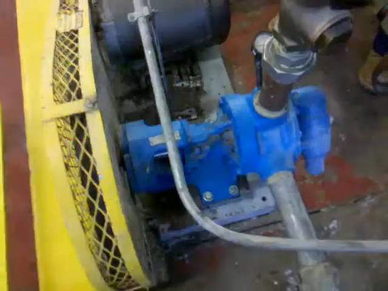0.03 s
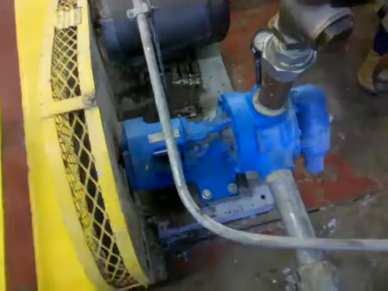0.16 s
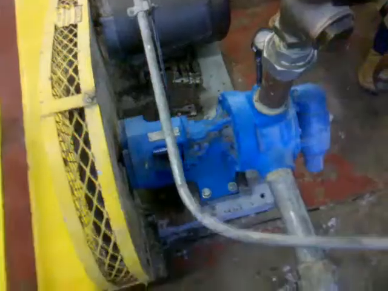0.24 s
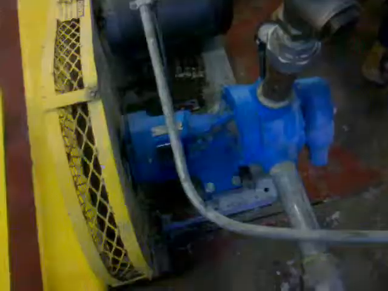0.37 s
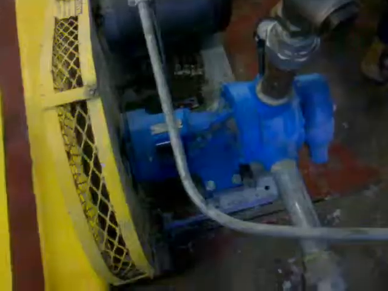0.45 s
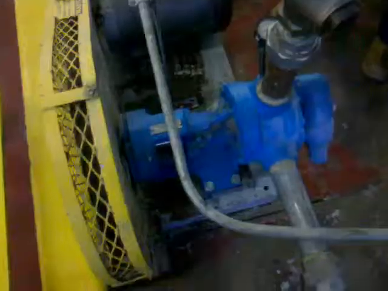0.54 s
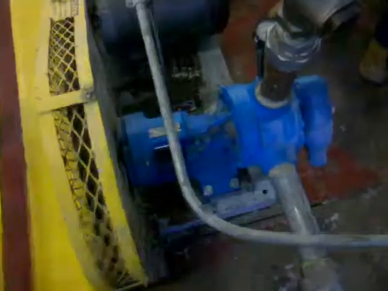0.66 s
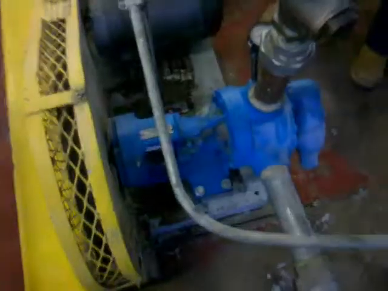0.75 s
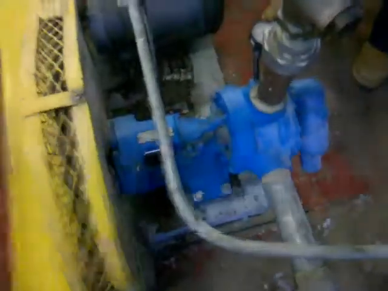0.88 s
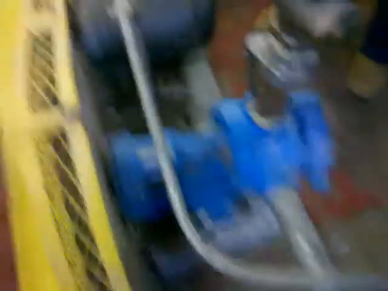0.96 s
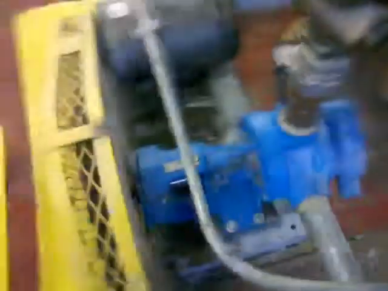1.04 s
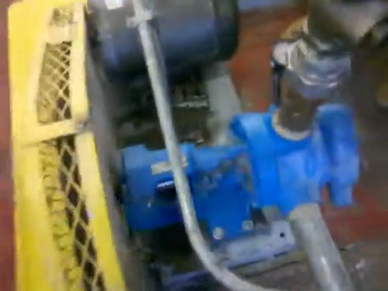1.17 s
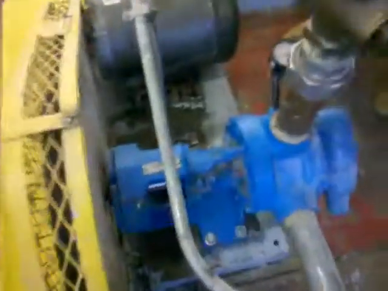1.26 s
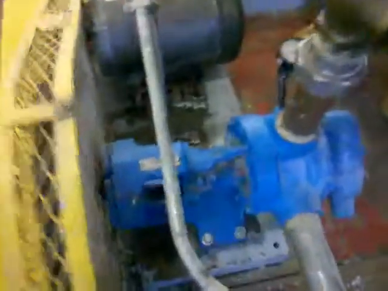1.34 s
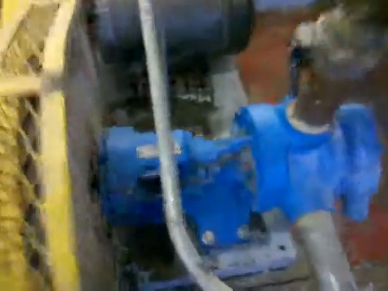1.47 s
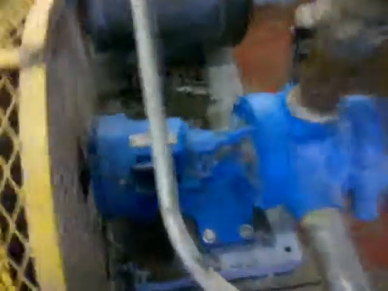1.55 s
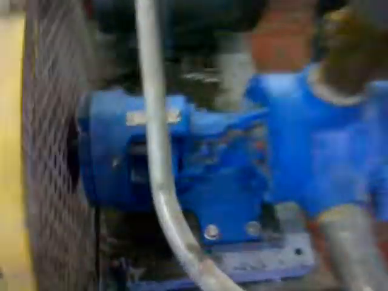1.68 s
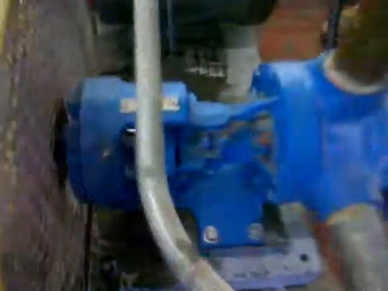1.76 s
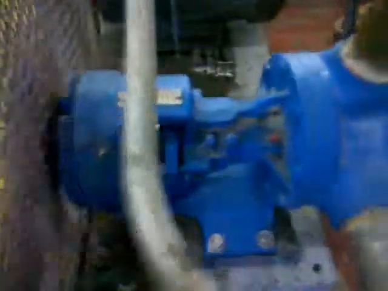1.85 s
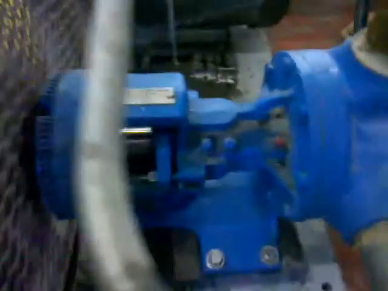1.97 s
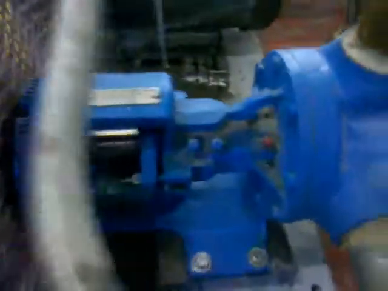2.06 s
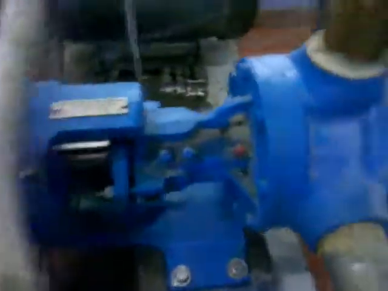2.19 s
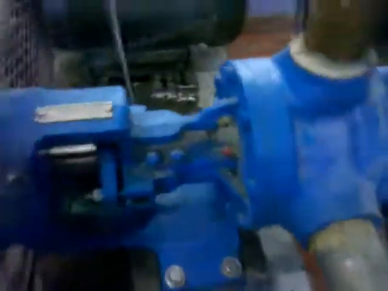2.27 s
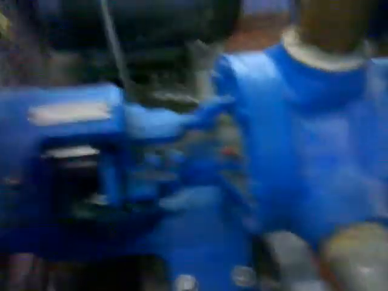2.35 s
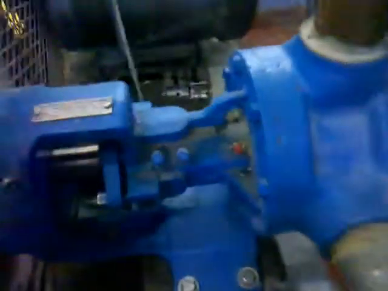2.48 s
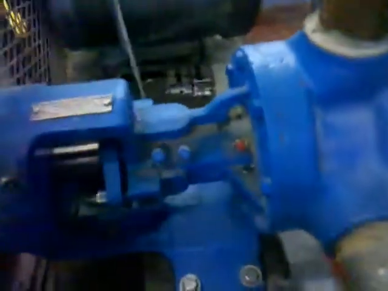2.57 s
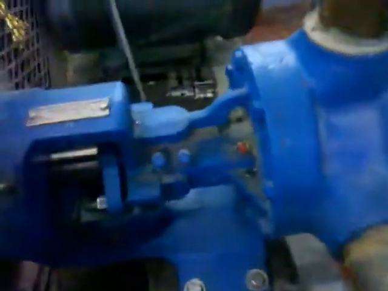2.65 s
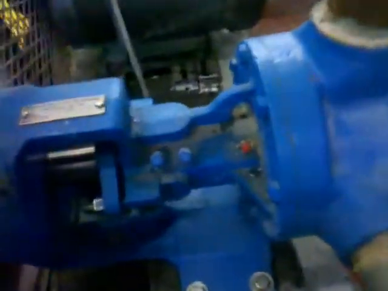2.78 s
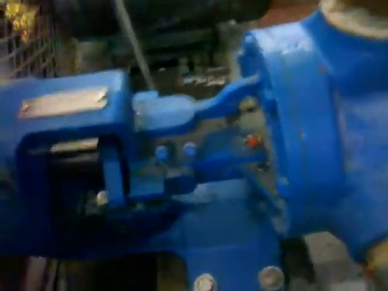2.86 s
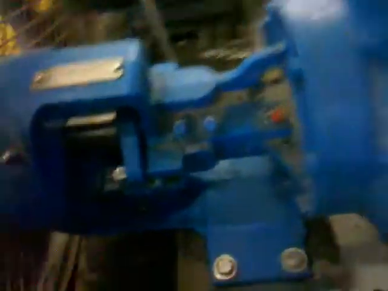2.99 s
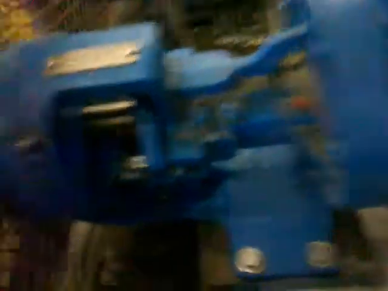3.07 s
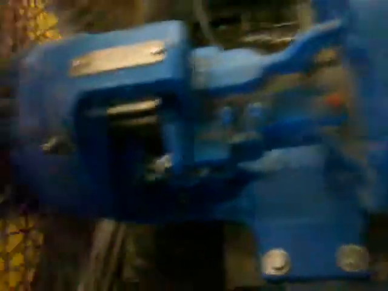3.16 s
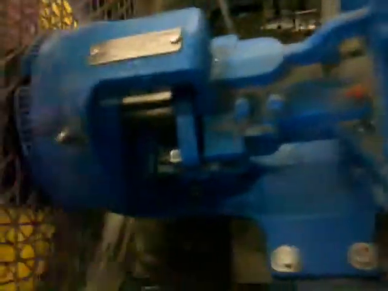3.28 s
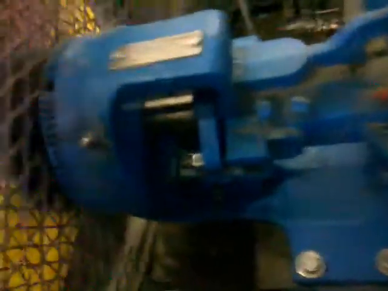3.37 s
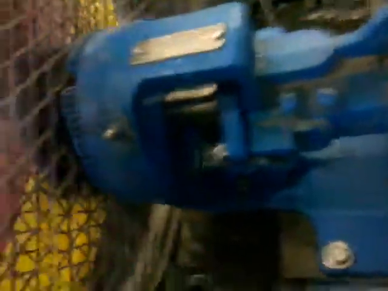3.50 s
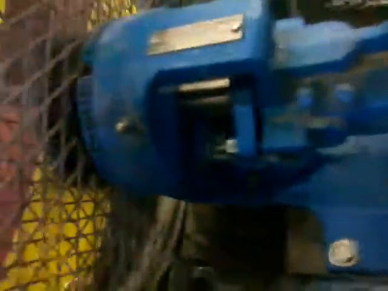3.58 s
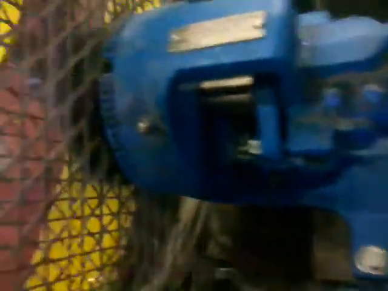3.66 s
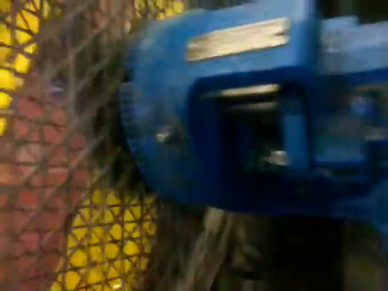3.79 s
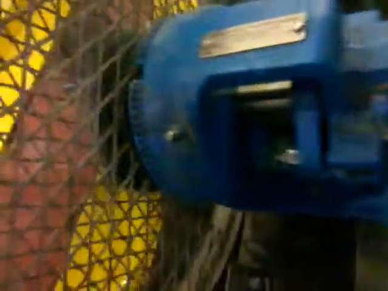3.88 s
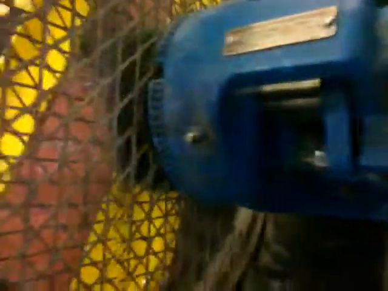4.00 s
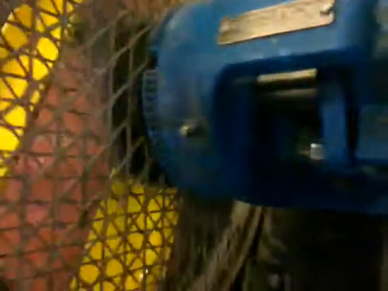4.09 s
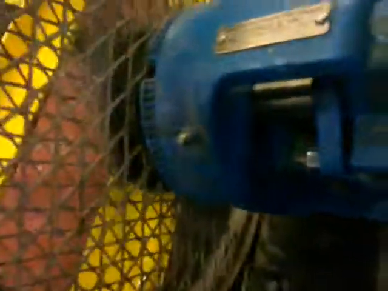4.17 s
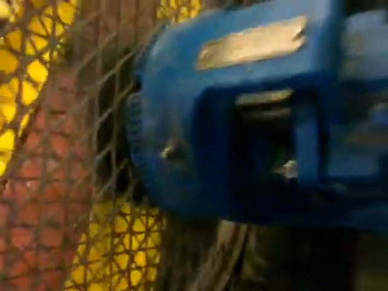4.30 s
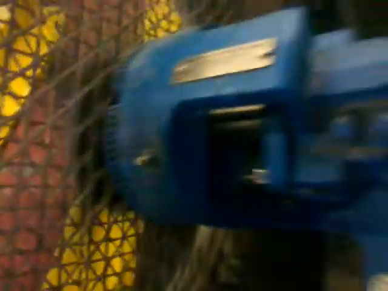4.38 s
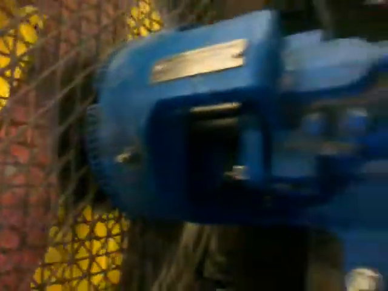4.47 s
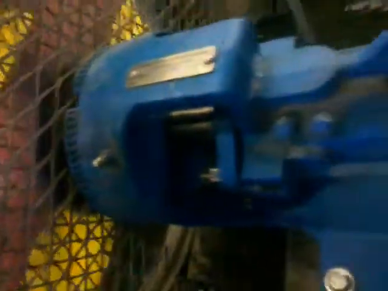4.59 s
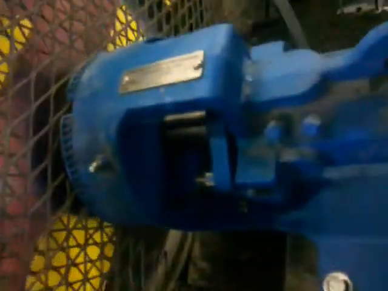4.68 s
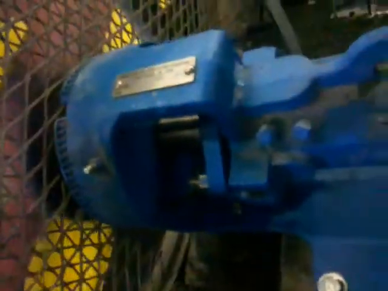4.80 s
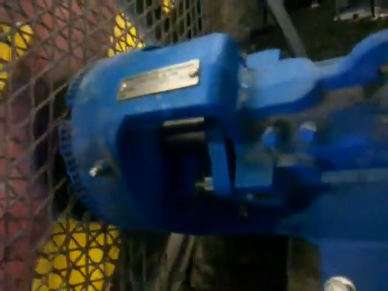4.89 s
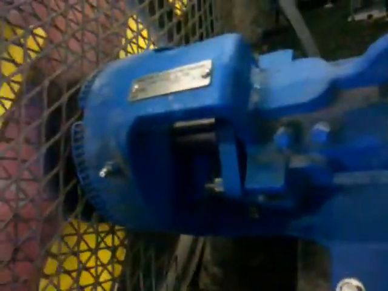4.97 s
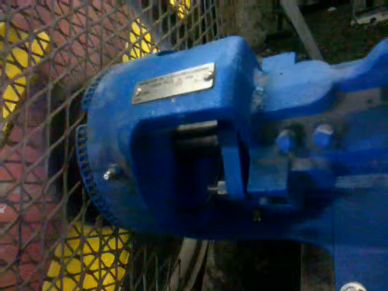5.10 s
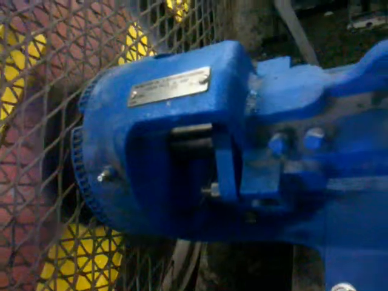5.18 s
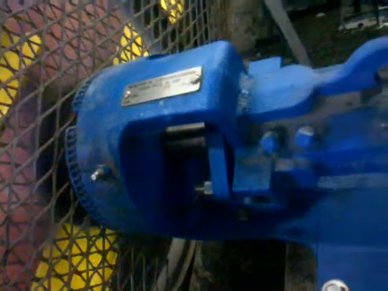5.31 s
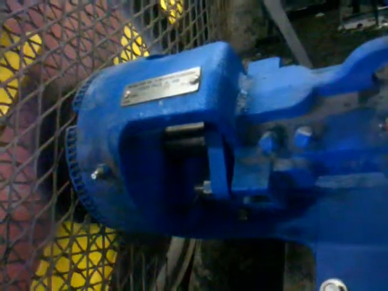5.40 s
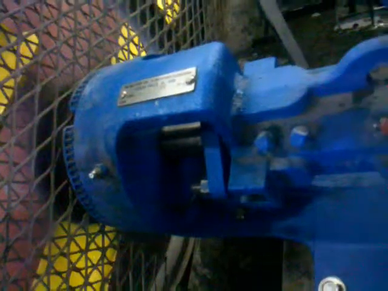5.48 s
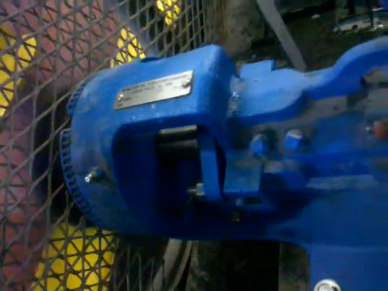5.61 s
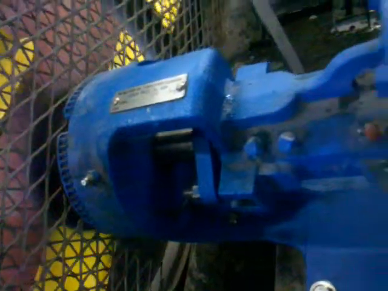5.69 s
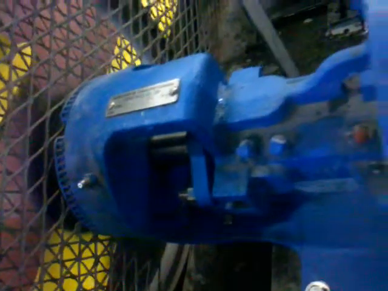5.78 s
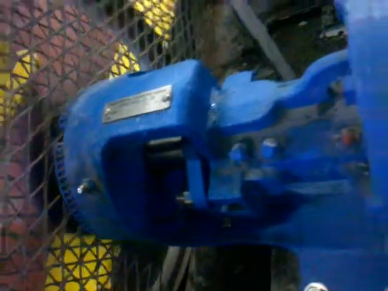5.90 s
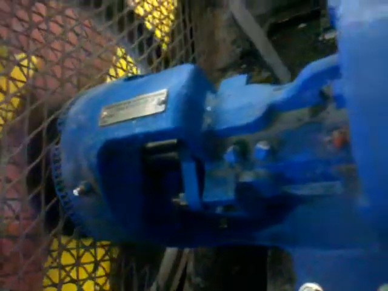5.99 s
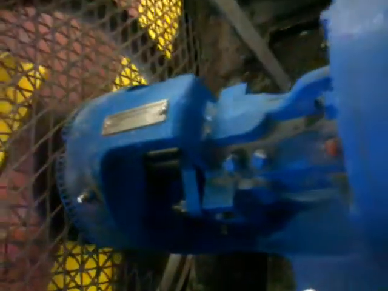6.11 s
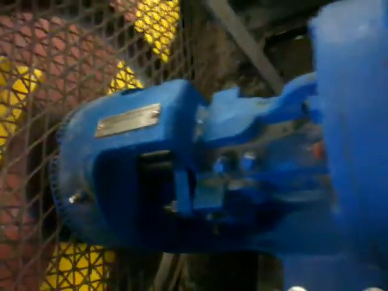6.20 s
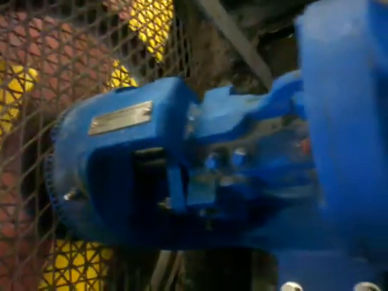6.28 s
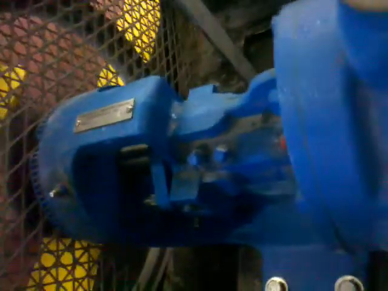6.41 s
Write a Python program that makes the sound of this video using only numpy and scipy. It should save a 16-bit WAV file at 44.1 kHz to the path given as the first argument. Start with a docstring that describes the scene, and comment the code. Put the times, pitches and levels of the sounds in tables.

```python
"""In a factory, the sound of a steady belt-driven pump fades in, heard by a hand-held microphone standing back.
Sines on multiples of the motor's turn make the hum, band-shaped noise the hall's rumble; each turn a blow
rings the casing and loose parts rattle. Near one second come a few handling clicks, short filtered rings.
Then the microphone moves in about .4 m: friction noise and thin tones of the bearing grow, and so does the
seal's noisy hiss, brightest near four seconds, then duller; knocks swell with each round of the big pulley."""
import sys
import numpy as np
from scipy import signal
from scipy.fft import rfft, irfft
from scipy.io import wavfile
from scipy.ndimage import map_coordinates

SR = 44100
rng = np.random.default_rng(int(sys.argv[2]) if len(sys.argv) > 2 else 0)


def master(y):
    """Save y as 16-bit WAV."""
    cut = np.clip(np.atleast_2d(y).T, -1, 1)
    pcm = np.round(cut * 32767)  # scale
    wavfile.write(sys.argv[1], SR, pcm.astype(np.int16))


N = 284445

MOTOR_HZ = 43.9
BELT_RATIO = 8  # motor turns in one round of the big pulley
FIRST_KNOCK_S, PULLEY_PEAK_S = .0105, .163
APPROACH_M = .4  # path from closeness 0 to closeness 1
NEAR_FIELD = .58  # from this closeness on, the machine has its close-up colour

# the microphone's way up to the bearing: (time [s], closeness [0-1])
MIC_CLOSENESS = [(.6, 0.07), (1.35, 0.14), (2, 0.48), (2.6, 0.61), (3.15, 0.82), (4, 0.97), (4.7, 1),
                 (6.45, 0.98)]
# phase between the two microphone ports: (frequency [Hz], lead of the left [rad])
PORT_LEAD = [(0, 0.52), (130, 1.15), (290, 2.02), (350, 1.28), (420, -0.4), (560, 0.38), (660, -0.5),
             (790, 0.98), (1100, -1.3), (1240, -0.2), (1810, -0.5), (2580, 1.5), (3700, 2.91), (6030, 7),
             (6630, 6.4), (8100, 2.9), (8440, 2.6), (9470, 0.7), (9730, -0.1), (13700, -9.3), (14000, -9.5)]
# likeness of the noise at the two ports: (frequency [Hz], likeness [0-1])
PORT_LIKENESS = [(60, 0.077), (500, 0.2), (1400, 0.66), (2100, 0.46), (3000, 1), (3900, 0.78),
                 (5500, 0.039), (13000, 0.59)]
# spectrum of hall and pump body: (frequency [Hz], relative density [dB per Hz])
RUMBLE_SPECTRUM = [(20, -41), (40, -39), (65, -23), (110, -13.5), (200, -13.5), (330, -4.5), (520, -2.5),
                   (850, -1.5), (1100, -4.5), (1450, -5.5), (1850, -19), (3000, -28), (6000, -50)]
# taps on the microphone's housing, level and crack taken before the housing's filter:
# (time [s], level [dB], pitch [Hz], t60 [s], crack against ring [dB], top of the band [Hz])
HANDLING_CLICKS = [(0.7085, -14.5, 2170, 0.0028, -11, 6000), (0.7077, -10.5, 1120, 0.0077, -4, 3160),
                   (0.9522, -17, 2280, 0.0044, -1, 5530), (0.9925, -20, 1320, 0.015, -10, 2600),
                   (0.997, -0.5, 890, 0.0018, -16, 2200), (1.017, -32, 870, 0.013, 5, 3000),
                   (1.0245, -17.5, 490, 0.017, -1.5, 3220), (1.025, -33, 4070, 0.008, -8, 4600)]
# spectrum of the shaft seal: (frequency [Hz], relative density [dB per Hz])
SEAL_SPECTRUM = [(3000, -33), (5300, -9), (6400, -3), (7400, 0.5), (7900, 1.5), (8700, 0), (9450, 1.5),
                 (9700, 5), (11000, 5), (12100, 4), (14000, -0.5)]
# course of the seal's hiss, before its common offset: (time [s], level [dB])
SEAL_COURSE = [(1.15, -53), (2.87, -43.5), (3.66, -37.5), (6.3, -37)]
# lift of the top of the hiss, greatest near four seconds: (time [s], lift [dB])
SEAL_TOP_LIFT = [(2.5, 3), (4.2, 4), (5.2, 2), (6.4, 0.7)]
# places in the turn where the seal spits: (share of a turn after the knock [0-1], added strength [ratio])
SEAL_SPITS = [(0.035, .38), (0.57, .17), (0.77, .27)]
# spectrum of the bearing's rubbing: (frequency [Hz], relative density [dB per Hz])
RUB_SPECTRUM = [(1200, -35), (2000, 7), (2500, -2), (2800, 0), (3150, 9.5), (3750, -1), (4300, 5),
                (5300, -11), (8000, -30)]
# resonances of the bearing: (frequency [Hz], width at half gain [Hz], relative level [dB])
BEARING_RINGS = [(2442, 52, 3.5), (2430, 220, -8), (2660, 230, -1), (2999, 42, 8.5), (3245, 36, 7.5),
                 (3694, 154, 6), (3990, 99, 2), (6070, 49, 0), (6630, 300, -5)]
# whine of the bearing: (frequency [Hz], peak against the ringing's rms [dB])
BEARING_WHINE = [(2420, -7.5), (3020, -5.5)]
# spectrum of the loose parts: (frequency [Hz], relative density [dB per Hz])
CHATTER_SPECTRUM = [(500, -66), (1050, 4.5), (1400, 12.5), (1850, -14), (2500, 5), (3150, 2), (4000, -0.5),
                    (4600, -14), (5500, -20.5), (10000, -14), (14000, -25)]
# chatter after each of the eight knocks in a pulley round: (relative strength [dB])
CHATTER_ROUND = [0, -.5, -.5, 1, 3.5, -1, -.5, -.5]
# casing rung by each knock: (frequency [Hz], level standing back [dB], level close up [dB])
CASING_RINGS = [(1292, 8, -14), (1340, -1, 6.5), (1408, 2, 12), (1434, 3, 14.5), (1575, 8.5, -3),
                (1652, -18, 3), (2545, -31, -34), (2580, -32, -30), (3038, -13, 3)]
# the eight knocks in a pulley round: (relative strength [dB])
KNOCK_ROUND = [1.2, -.3, -1.6, -4.8, -4.2, 1.8, 2.5, 1.5]
# course of the knocking, before the gain for distance: (time [s], level [dB])
KNOCK_COURSE = [(1.15, -34), (1.55, -32), (1.59, -29), (2.17, -30), (3.3, -29), (4.19, -32), (4.49, -29.5),
                (6.2, -28)]
# hum partials: (multiple of the motor turn, level standing back [dB], level halfway [dB],
# level close up [dB], left minus right close up [dB])
HUM_PARTIALS = [(3, -20.5, -18.5, -20.5, -4.0), (4, -15, -32, -30.5, 26), (5, -11.5, -17, -30, 1),
                (6, -9.5, -10.0, -12.5, -8), (7, -11, -23.5, -16.5, -11.5), (8, -16.5, -17.0, -22, 8),
                (9, -28, -20, -17, -6), (10, -15.5, -9.5, -10, -9.5), (11, -13.5, -6, -9, 3),
                (12, -6.5, -12, -11.5, -2), (13, -4.5, -10.5, -6, -2.5), (14, -9.5, -9, -9.5, 13),
                (15, -8, -15, -11, 10), (16, -10.5, -14, -11, -2), (17, -29, -30, -15.5, -17),
                (18, -8, -9.5, -14.0, 3), (19, -16, -9, -7, -0.5), (20, -11.0, -13.5, -11, 2.5),
                (21, -9, -15.5, -22.5, 9), (22, -22, -27, -21, 7), (23, -15, -14, -14, -5),
                (24, -24, -26, -27.5, 2), (25, -22, -21, -36.5, -7), (26, -28, -25, -29, -2.5),
                (27, -14, -16, -26.5, 10), (28, -11.0, -14, -16.5, 2.5), (35, -16, -15, -30, -1.0)]
# standing-wave crests and troughs on the microphone's way:
# (multiple of the motor turn, time [s], half-length [s], lift [dB])
STANDING_WAVES = [(5, 1.6, 0.28, 9), (8, 1.53, 0.32, 12), (8, 3.1, .35, -10), (16, 5.4, 0.64, -12),
                  (19, 4.5, .6, -4.5), (21, 3, 0.82, 11.5), (25, 3.5, 0.77, 19), (26, 3.94, 0.63, 12),
                  (28, 3.7, .6, -4), (28, 6.62, .8, 9.5)]


def undb(db):
    """Decibels to gain."""
    return 10 ** (np.asarray(db) / 20)


def unit(x):
    """Scale to rms 1."""
    return x / np.sqrt(np.mean(x ** 2))


def clock():
    """Time of every sample at the microphone [s]."""
    return np.arange(N) / SR


def curve(table):
    """Second column of a table, joined by straight lines in time."""
    time, value = np.transpose(table)
    return np.interp(clock(), time, value)


def bins():
    """Frequency of every spectral bin [Hz], at least 1."""
    return np.maximum(np.arange(N // 2 + 1) * SR / N, 1)


def across(points):
    """Frequency points joined by straight lines on a log-frequency axis."""
    hz, value = np.transpose(points)
    return np.interp(np.log(bins()), np.log(hz), value)


def wander(rate):
    """Smooth random drift with a spread near 1, from `rate` random knots per second."""
    knots = rng.standard_normal(int(N / SR * rate) + 4)
    grid = np.arange(0, N + 200, 200)
    coarse = map_coordinates(knots, [grid / SR * rate], order=3, mode="nearest")
    return np.interp(np.arange(N), grid, coarse)


def bandpass(x, order, band_hz):
    """Keep one band of a sound."""
    return signal.sosfilt(signal.butter(order, band_hz, "band", fs=SR, output="sos"), x)


def approach(close_db, drop_db):
    """Gain of a part that grows evenly in dB with closeness; at closeness 0 it is drop_db weaker."""
    return undb(close_db - drop_db * (1 - curve(MIC_CLOSENESS)))


def colour():
    """How far the sound has turned from its distant to its close-up colour, 0 to 1."""
    return np.clip(curve(MIC_CLOSENESS) / NEAR_FIELD, 0, 1)


def machine_time():
    """When the sound now arriving left the machine: earlier while the microphone stands back."""
    return clock() - APPROACH_M * (1 - curve(MIC_CLOSENESS)) / 343  # speed of sound in m/s


def since_knock():
    """Seconds since the latest knock of the drive."""
    return (machine_time() - FIRST_KNOCK_S) % (1 / MOTOR_HZ)


def pulley(t):
    """The load rises and falls once per round of the big pulley, -1 to 1."""
    return np.cos(2 * np.pi * MOTOR_HZ / BELT_RATIO * (t - PULLEY_PEAK_S))


def recurring(x, period):
    """The opening stretch of a noise, played again in every period of the machine."""
    return x[:, (machine_time() % period * SR).astype(int)]


def excitation(per_turn, per_round):
    """Two noises; one share of each recurs every motor turn, another every round of the big pulley."""
    fresh, turn, pulley_round = rng.standard_normal((3, 2, N))
    out = np.sqrt(1 - per_turn - per_round) * fresh
    out += np.sqrt(per_turn) * recurring(turn, 1 / MOTOR_HZ)
    out += np.sqrt(per_round) * recurring(pulley_round, BELT_RATIO / MOTOR_HZ)
    return out


def noise(gain, per_turn=0, per_round=0):
    """Stereo noise of rms 1 with the given gain per bin, partly alike at the two ports."""
    like = np.clip(across(PORT_LIKENESS), 0, 1)
    mid, side = rfft(excitation(per_turn, per_round))
    mid, side = mid * np.sqrt(1 + like), side * np.sqrt(1 - like)
    return unit(irfft(gain * np.array([mid + side, mid - side]), N))


def ports(x):
    """The same sound reaches the two ports a little out of step, by frequency."""
    hz, lead = np.transpose(PORT_LEAD)
    turn = np.exp(1j * np.interp(bins(), hz, lead) / 2)
    return irfft(rfft(x) * np.array([turn, turn.conj()]), N)


def rumble(shake=1.0, decay_s=.005):
    """Hall and pump body rumble as shaped noise; each knock shakes the body for a moment."""
    body = noise(undb(across(RUMBLE_SPECTRUM)), per_round=.65)
    return body * (1 + shake * np.exp(-since_knock() / decay_s))


def clicks():
    """Small taps on the microphone's housing: a dead ring with a brief crack and no bass."""
    out, t = np.zeros(N), clock()[:SR // 20]
    for time, db, hz, t60, crack_db, top_hz in HANDLING_CLICKS:
        tap = np.sin(2 * np.pi * hz * t) + undb(crack_db) * rng.standard_normal(len(t))
        tap *= undb(db - 60 * t / t60)
        start = int(time * SR)
        out[start:start + len(t)] += bandpass(tap, 3, [hz / 2, top_hz])
    return out


def seal(flutter_db=1.5, swell_db=.53, spit_s=.00077):
    """The shaft seal hisses, and spits briefly at the same spots of every turn."""
    hiss = noise(undb(across(SEAL_SPECTRUM)))
    top = irfft(rfft(hiss) * across([(10000, 0), (12000, 1)]), N)
    hiss = hiss + top * (undb(curve(SEAL_TOP_LIFT)) - 1)
    age, spits = since_knock(), 0
    for spot, strength in SEAL_SPITS:
        spits = spits + strength * np.exp(-((age - spot / MOTOR_HZ) / spit_s) ** 2)
    return hiss * (1 + spits) * undb(swell_db * pulley(clock()) + flutter_db * wander(90))


def friction(pulse, swell_db, flutter_db):
    """Strength of the bearing's friction: it pulses with each turn and shifts with the load."""
    load = undb(swell_db * pulley(clock()) + flutter_db * wander(40))
    return load * (1 + pulse * np.exp(-since_knock() / .016))


def rubbing():
    """The bearing's broad rubbing: shaped noise that follows the friction."""
    rub = noise(undb(across(RUB_SPECTRUM)), per_turn=.1, per_round=.3)
    return rub * friction(pulse=.3, swell_db=-.45, flutter_db=2.1)


def rings():
    """Friction noise rings the bearing's resonances, so each flickers in pitch and level within its width."""
    gain = 0
    for hz, width, db in BEARING_RINGS:
        gain = gain + undb(db) / (1 + (2 * (bins() - hz) / width) ** 2)
    return noise(gain)


def whine(waver_hz=5, waver_db=2):
    """Thin, nearly steady tones of the bearing, drifting a little in pitch and level."""
    out = np.zeros(N)
    for hz, db in BEARING_WHINE:
        phase = 2 * np.pi * np.cumsum(hz + waver_hz * wander(20)) / SR
        out += np.sin(phase) * undb(db + waver_db * wander(4.33))
    return out


def chatter(rise_s=.0006, decay_s=.0045):
    """Loose parts rattle after every knock, hardest at one place in the round of the big pulley."""
    age = since_knock()
    turn = np.floor((machine_time() - FIRST_KNOCK_S) * MOTOR_HZ).astype(int)
    burst = (1 - np.exp(-age / rise_s)) * np.exp(-age / decay_s)
    strength = undb(np.take(CHATTER_ROUND, turn % BELT_RATIO))
    rattle = noise(undb(across(CHATTER_SPECTRUM)), per_turn=.25, per_round=.5)
    return unit(rattle * burst * strength)


def blow_train(scatter_db=1.5, rebound_s=.003127, rebound_db=-4.5):
    """One impulse per motor turn as it arrives at the microphone, each with a weaker rebound."""
    times = FIRST_KNOCK_S + np.arange(int(N / SR * MOTOR_HZ)) / MOTOR_HZ
    chance = rng.standard_normal((len(times), 4))
    size = undb(np.resize(KNOCK_ROUND, len(times)) + scatter_db * chance[:, 0])
    first = np.interp(times, machine_time(), clock()) + .00002 * chance[:, 1]
    second = first + rebound_s + .00004 * chance[:, 2]
    blows = np.zeros(N)
    blows[(first * SR).astype(int)] = size
    blows[(second * SR).astype(int)] = size * undb(rebound_db + 2 * chance[:, 3])
    return blows


def knocks(contact_s=.0045, t60_s=.027):
    """Each blow cracks, clacks and rings the casing's resonances; the colour changes with distance."""
    blows = blow_train()
    crack = bandpass(blows, 2, (1600, 3300))  # dry start of the knock
    clack = bandpass(blows, 3, (940, 1520))  # its dead, lower part
    out = -crack / np.abs(crack).max() * approach(close_db=3, drop_db=8)
    out += clack / np.abs(clack).max() * approach(close_db=8.5, drop_db=4)
    t, close = clock()[:SR // 8], colour()
    envelope = undb(-60 * t / t60_s) * (1 - np.exp(-t / contact_s))
    for hz, far_db, near_db in CASING_RINGS:
        ring = envelope * np.sin(2 * np.pi * hz * t)
        out += signal.oaconvolve(blows, ring)[:N] * undb(far_db + (near_db - far_db) * close)
    return unit(out)


def crest(multiple):
    """Lift in dB of one partial while the microphone passes a crest or trough of its standing wave."""
    lift = 0
    for k, time, half, db in STANDING_WAVES:
        if k == multiple:
            lift = lift + db * np.exp(-((clock() - time) / half) ** 2)
    return lift


def hum(throb_db=.5, sway_s=.000032, waver_db=1.0):
    """Motor harmonics; standing waves give each its own strength and side as the microphone moves."""
    t, close = machine_time(), colour()
    turns = MOTOR_HZ * (t + sway_s * wander(7))  # the shaft's timing sways
    out = np.zeros((2, N))
    for k, *levels_db, pan_db in HUM_PARTIALS:
        # closeness at the three levels: standing back, halfway, close up
        db = np.interp(curve(MIC_CLOSENESS), (.07, .5, 1), levels_db)
        db = db + crest(k) + waver_db * wander(5)
        # the frame delays each partial differently, spreading the hum over the turn in a few soft beats
        spread = np.pi * .41 * k ** 2 + .25 * rng.standard_normal()
        spread = spread + .1 * wander(5) + .04 * wander(30)
        phase = 2 * np.pi * k * turns + spread
        lead = .25 * rng.standard_normal()
        lean = undb(pan_db * close)
        gain = undb(db) * np.sqrt(4 / (1 + lean ** 2))  # keeps the power of both sides together
        out[0] += gain * lean * np.sin(phase + lead / 2)
        out[1] += gain * np.sin(phase - lead / 2)
    return out * undb(throb_db * pulley(t))


def scene():
    """The hall, seal, bearing and drive at the moving microphone, with the taps on its housing."""
    machine = rumble() * approach(close_db=-29, drop_db=13)
    machine = machine + seal() * undb(6 + curve(SEAL_COURSE))  # common offset of 6 dB
    machine += rubbing() * approach(close_db=-35.6, drop_db=14.5)
    ringing = (rings() + whine()) * friction(pulse=.88, swell_db=-2.0, flutter_db=1.5)
    machine += ringing * approach(close_db=-36.5, drop_db=22)
    machine += chatter() * approach(close_db=-31.8, drop_db=17)
    machine += knocks() * undb(curve(KNOCK_COURSE)) * approach(close_db=-1, drop_db=8.5)
    machine += hum() * approach(close_db=-21, drop_db=18)
    start_s, length_s, bend = .32, .34, 1.12
    fade_in = np.clip((clock() - start_s) / length_s, 0, 1) ** bend
    return (ports(machine) + clicks()) * fade_in


def record(dry):
    """The recorder cuts the top steeply, above 13930 Hz."""
    return signal.sosfilt(signal.ellip(12, .2, 80, 13930, fs=SR, output="sos"), dry)


dry = scene()
out = record(dry)
master(out)
```